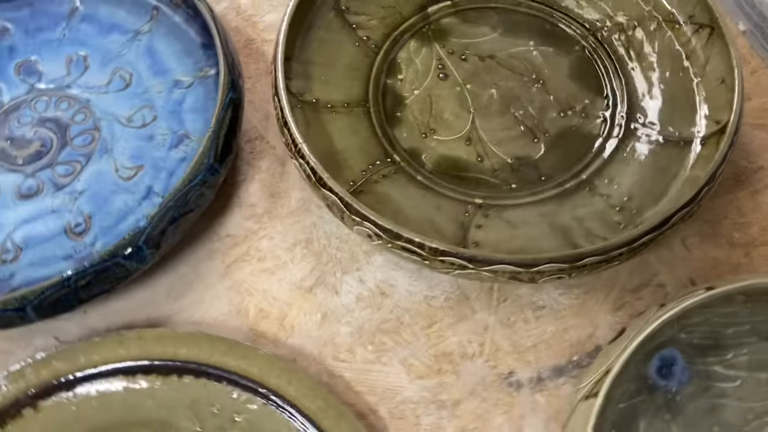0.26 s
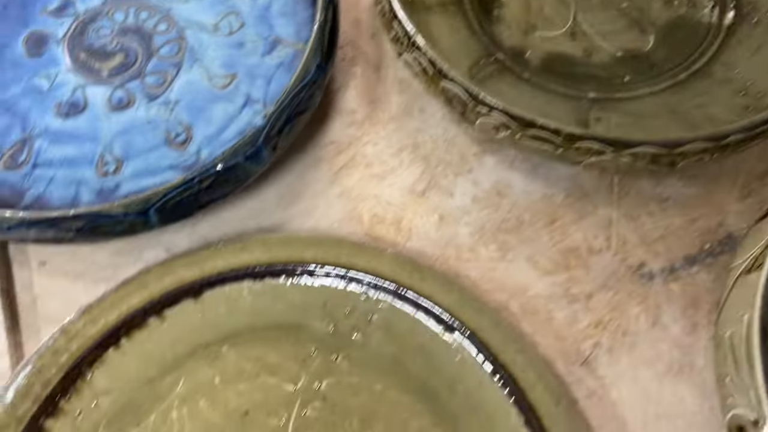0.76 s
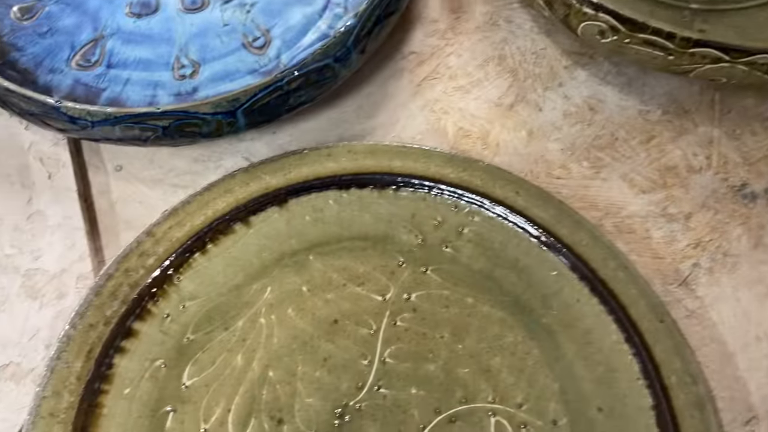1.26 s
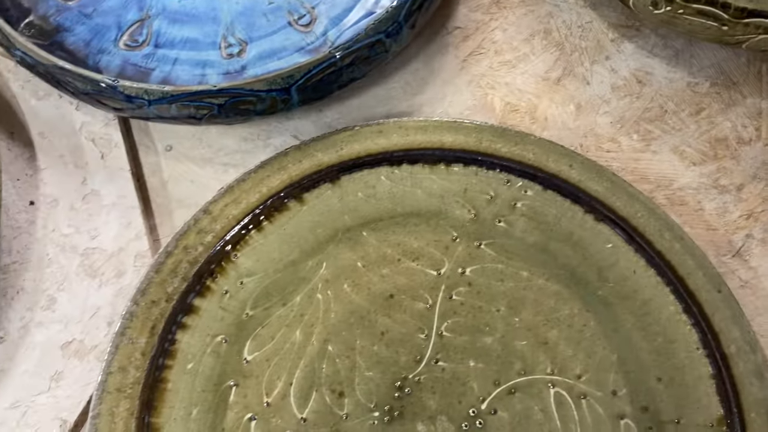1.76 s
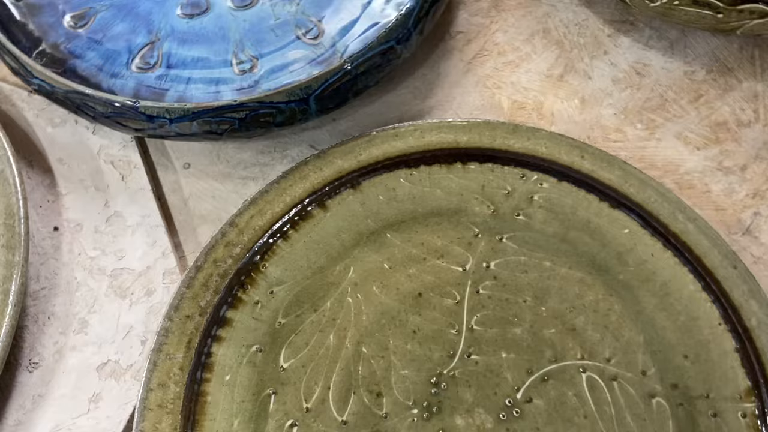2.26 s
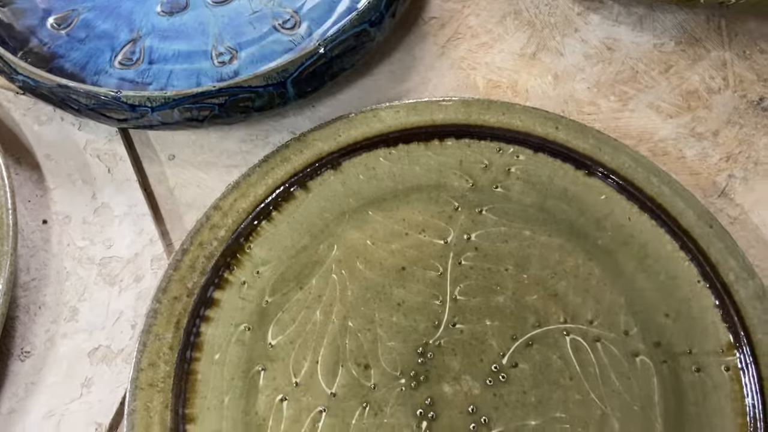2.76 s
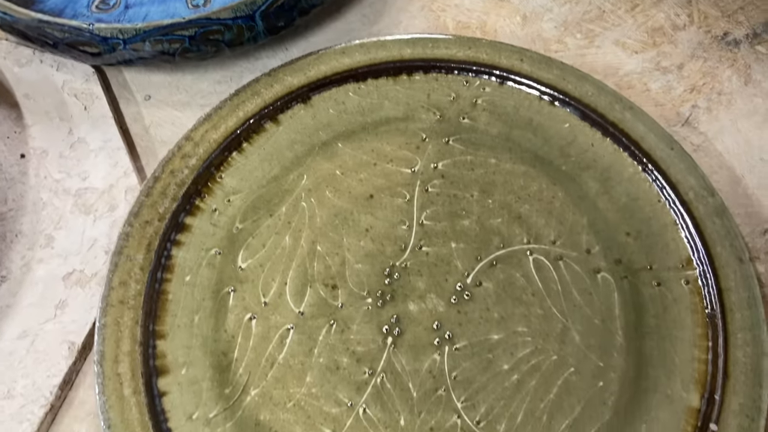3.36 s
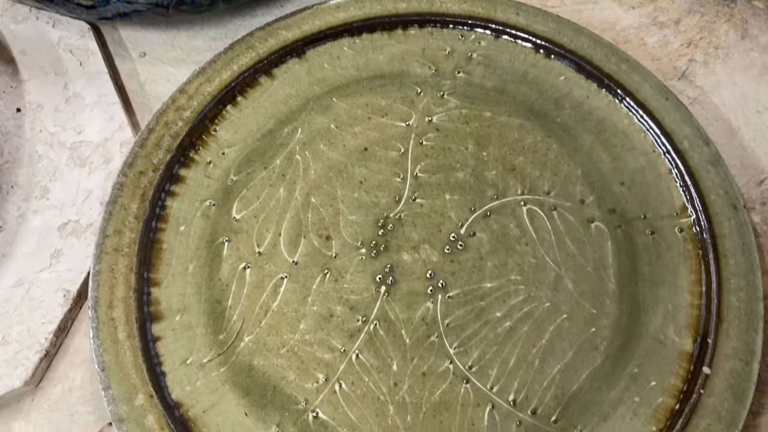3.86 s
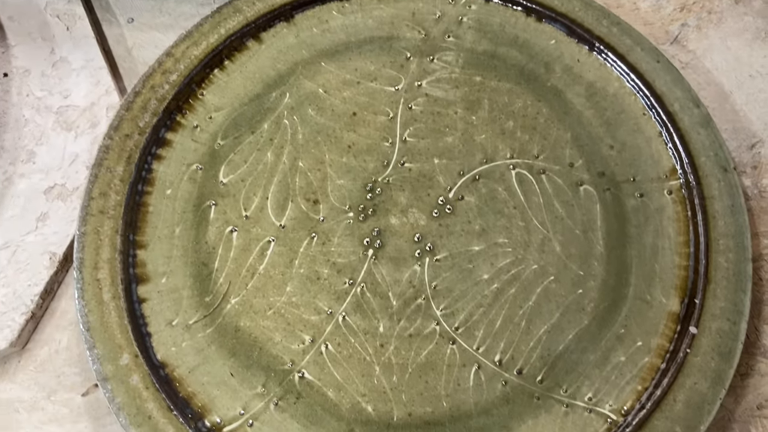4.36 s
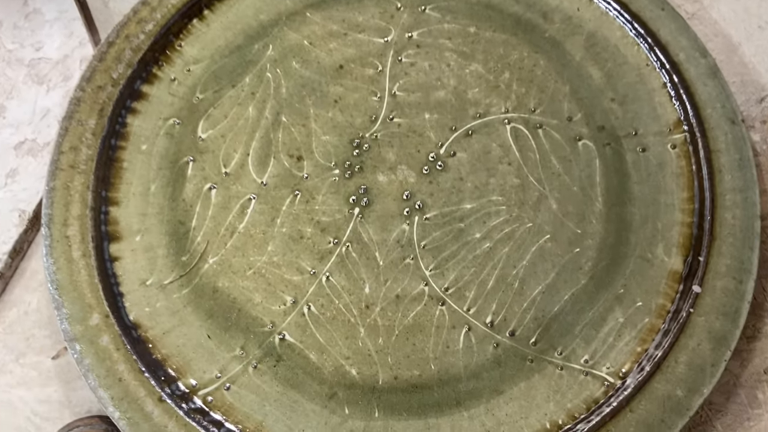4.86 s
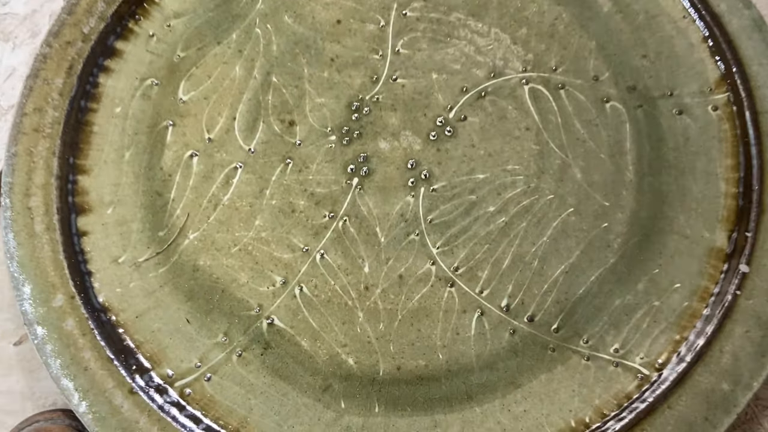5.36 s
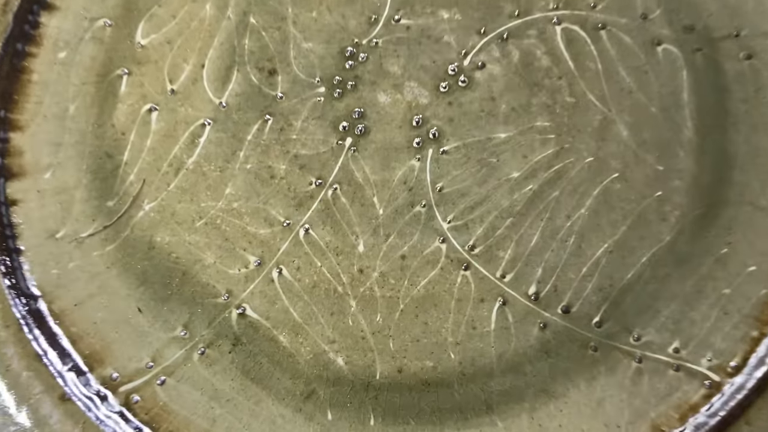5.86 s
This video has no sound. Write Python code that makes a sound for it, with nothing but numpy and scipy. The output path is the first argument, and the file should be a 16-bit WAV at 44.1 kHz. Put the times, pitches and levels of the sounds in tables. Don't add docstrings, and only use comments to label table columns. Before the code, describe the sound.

Right at the start heavy stoneware lands on a board table with a deep, woody thump, a faint glaze clink and softer rocking knocks. A short gritty drag ends in a bump, then a second heavy thud lands. Afterwards only low room rumble remains, with cloth rustle and small plastic ticks close to a handheld stereo microphone in a small furnished room.

```python
import sys
import numpy as np
from scipy import signal
from scipy.fft import rfft, irfft, next_fast_len
from scipy.io import wavfile
from scipy.ndimage import uniform_filter1d, map_coordinates

SR = 44100
rng = np.random.default_rng(int(sys.argv[2]) if len(sys.argv) > 2 else 0)


def generate_wav(sig):
    pcm = np.round(np.clip(np.atleast_2d(sig).T, -1, 1) * 32767).astype(np.int16)
    wavfile.write(sys.argv[1], SR, pcm)


def attenuation_scalar(level_db):
    decades = np.asarray(level_db, float) / 20
    return 10 ** decades


N = 269225


def unit(x):
    return x / np.sqrt(np.mean(x ** 2) + 1e-20)


def along(points, hz):
    f, v = np.transpose(points)
    return np.interp(np.log(hz + 1), np.log(f + 1), v)


def curves(rows, outside=None):
    s, *cols = np.transpose(rows)
    t = np.arange(N) / SR
    return [np.interp(t, s, c, outside, outside) for c in cols]


def wobble(rate):
    knots = rng.standard_normal(int(N * rate / SR) + 4)
    return map_coordinates(knots, [np.arange(N) * rate / SR])


def swells(rows, rest_db):
    t = np.arange(N) / SR
    power = attenuation_scalar(rest_db) ** 2
    for s, db, rise, t60 in rows:
        fall_db = np.where(t < s, 9 * ((s - t) / rise) ** 2, 60 * (t - s) / t60)
        power = power + attenuation_scalar(db - fall_db) ** 2
    return np.sqrt(power)


def filtered(x, response):
    n = x.shape[-1]
    m = next_fast_len(n + 8192)
    return irfft(rfft(x, m) * response(np.fft.rfftfreq(m, 1 / SR)), m)[..., :n]


def band(noise, low_hz, high_hz):
    def response(f):
        low = (f / low_hz) ** 2
        return low / (1 + low) / (1 + (f / high_hz) ** 2)
    return unit(filtered(noise, response))


# (frequency [Hz], side minus mid [dB])
PORT_WIDTH = [(60, -18), (150, -12.5), (380, -3.5), (950, 0.5), (2400, -0.5), (5500, -1), (7000, -17.5),
              (16000, -21)]


def rush(spectrum, patchy_db):
    z = signal.stft(rng.standard_normal((2, N + 512)), nperseg=512)[2]
    field = uniform_filter1d(rng.standard_normal(z.shape[1:]), size=6, axis=0)
    field = uniform_filter1d(field, size=8, axis=1)
    pair = signal.istft(z * attenuation_scalar(patchy_db * unit(field)), nperseg=512)[1][:, :N]
    mid, side = filtered(pair, lambda hz: attenuation_scalar(along(spectrum, hz)) * [1 + 0 * hz, attenuation_scalar(along(PORT_WIDTH, hz))])
    return np.array([mid + side, mid - side]) / np.sqrt(np.mean(mid ** 2))


def ring(modes, t, rise_cycles):
    total = 0
    for hz, db, t60 in modes:
        build_up = 1 - np.exp(-(t * hz / rise_cycles) ** 2)
        total = total + attenuation_scalar(db - 60 * t / t60) * build_up * np.sin(2 * np.pi * hz * t)
    return total


def add(track, s, sound):
    i = round(s * SR)
    track[..., i:i + sound.shape[-1]] += sound[..., :track.shape[-1] - i]


def sides(db):
    return attenuation_scalar([[db / 2], [-db / 2]])


# (frequency [Hz], t60 [s])
ROOM_DECAY = [(70, 0.83), (200, 0.53), (500, 0.28), (1200, 0.18), (4000, 0.17), (12000, 0.1)]
EARLY_DB, EARLY_S = -9, .006


def in_room(sound, wet_db):
    hz, t, z = signal.stft(rng.standard_normal((2, SR // 2)), SR, nperseg=256)
    decay = attenuation_scalar(-60 * t / along(ROOM_DECAY, hz)[:, None])
    tail = signal.istft(z * decay, SR, nperseg=256)[1]
    tail = tail / np.linalg.norm(tail[0])
    mid, side = filtered(tail, lambda f: .45 + .55 * f ** 2 / (f ** 2 + 220 ** 2))
    side = filtered(side, lambda f: attenuation_scalar(along(PORT_WIDTH, f) - 1.0))
    early = side * np.exp(-np.arange(len(side)) / (EARLY_S * SR))
    early = attenuation_scalar(EARLY_DB) * early * np.linalg.norm(side) / np.linalg.norm(early)
    ears = attenuation_scalar(wet_db) * np.array([mid + side, mid - side]) + early * [[1], [-1]]
    wet = signal.fftconvolve(sound[None], ears, axes=1)
    return wet + np.pad(sound, (0, wet.shape[1] - len(sound)))


# (frequency [Hz], level [dB])
RUMBLE_SPECTRUM = [(15, -9.5), (34, 0), (59, 1.5), (110, -8), (140, -21.5), (190, -21.5), (260, -30.5),
                   (500, -81)]
# (frequency [Hz], level [dB])
MURMUR_SPECTRUM = [(88, -41), (150, 1.5), (173, -8), (231, -11.5), (297, -13), (389, -17.5), (668, -20.5),
                   (1500, -38), (1950, -67), (3300, -120)]
# (peak time [s], peak level [dB], rise [s], t60 [s])
FLOOR_SHUDDERS = [(.32, -55, 0.11, 0.87), (.44, -39.5, 0.09, 0.64), (.58, -46, .05, 0.33),
                  (1.97, -42, 0.199, 0.83), (2.62, -59, 0.099, 3.8)]
# (peak time [s], peak level [dB], rise [s], t60 [s])
ROOM_FILLS = [
    (.13, -40.5, 0.031, 0.68),
    (.45, -63, .03, 1.7),
    (1.1, -67, 0.88, 0.99),
    (2.0, -62.5, 0.03, 1.4),
    (2.6, -68.5, 0.43, 1.94),
    (5.5, -74, 0.32, 2),
]
# (frequency [Hz], level [dB], start [s], stop [s])
FAR_MACHINE = [
    (157, -67, 3.8, 4.68),
    (4870, -101, 4.2, 4.66),
]
RUMBLE_DB, MURMUR_DB = -61.5, -73
ROOM_PAN_DB = 2


def air():
    out = attenuation_scalar(5.5) * swells(FLOOR_SHUDDERS, RUMBLE_DB) * rush(RUMBLE_SPECTRUM, patchy_db=-0.48)
    out = out + attenuation_scalar(2.0) * swells(ROOM_FILLS, MURMUR_DB) * rush(MURMUR_SPECTRUM, patchy_db=2.5)
    t = np.arange(N) / SR
    for hz, db, start, stop in FAR_MACHINE:
        running = np.clip(np.minimum(t - start, stop - t) / .1, 0, 1)
        level = running * attenuation_scalar(db + hz ** .17 * wobble(14))
        drift = .6 * wobble(15) + hz / 3000 * wobble(90)
        out = out + level * np.sin(2 * np.pi * hz * t + drift)
    return sides(ROOM_PAN_DB) * out


# (time [s], rustle level [dB])
ARM_MOVEMENT = [(0, -89.5), (.092, -86.5), (.105, -70.5), (.63, -68), (.85, -74.5), (.98, -67),
                (1.1, -69.5), (1.21, -82.5), (1.51, -89.5), (1.65, -71), (3.02, -75.5), (3.06, -82),
                (3.72, -89.5), (4.81, -87.5), (5.32, -80.5), (5.45, -73.5), (5.69, -80), (6.1, -86)]
# (frequency [Hz], level [dB])
FABRIC_SPECTRUM = [(1500, -32.5), (2800, -8), (4500, -10), (7500, -10.5), (11300, -9.5), (12600, -11),
                   (13400, -22), (15500, -23.5), (15850, -55)]
# (frequency [Hz], level [dB])
RUB_SPECTRUM = [(500, -30.5), (900, -0.5), (1500, -1), (2300, -2), (3200, -13), (5000, -23.5), (8000, -81)]
# (peak time [s], peak level [dB], rise [s], t60 [s])
HAND_SCUFFS = [
    (.14, -67.5, 0.061, 1.7),
    (1.56, -78.5, 0.041, 1.06),
    (1.87, -67.5, 0.1, 1.2),
    (2.46, -65.5, 0.022, 0.9),
    (2.74, -74.5, 0.13, 0.67),
]
# (time [s], level [dB])
SLEEVE_BRUSH = [(5.27, -104), (5.36, -75.5), (5.45, -75.5), (5.5, -90), (5.6, -80.5), (5.72, -77.5),
                (5.76, -102)]
RUB_DB, RUB_GROWS, ARMS_PAN_DB = -83.5, 0.64, 0


def cloth():
    arms_db, = curves(ARM_MOVEMENT)
    fine_gain = attenuation_scalar(arms_db + 0.86 * wobble(22) + 0.9 * wobble(5.5))
    fine = fine_gain * rush(FABRIC_SPECTRUM, patchy_db=2.0)
    rub_gain = swells(HAND_SCUFFS, RUB_DB + RUB_GROWS * (arms_db + 80)) * attenuation_scalar(0.64 * wobble(30))
    rub = rub_gain * rush(RUB_SPECTRUM, patchy_db=1.93)
    brush_gain = attenuation_scalar(curves(SLEEVE_BRUSH, -140)[0] + 2.2 * wobble(40))
    brush_spectrum = [(1500, -22), (3000, -10.0), (4000, -0.5), (5200, -9.5), (8000, -9.0), (12300, -8.5),
                      (13500, -32), (16000, -60)]
    brush = brush_gain * rush(brush_spectrum, patchy_db=2.0)
    return sides(ARMS_PAN_DB) * (fine + rub + brush)


# (frequency [Hz], level [dB])
SHEEN_SPECTRUM = [(13000, -40), (13900, -6), (14600, 0), (15500, -2), (15850, -40)]
SHEEN_DB, SHEEN_GROWS = -87.5, 1.5


def sheen():
    level_db = SHEEN_DB + SHEEN_GROWS * (curves(ARM_MOVEMENT)[0] + 70)
    return attenuation_scalar(level_db + 1.2 * wobble(9)) * rush(SHEEN_SPECTRUM, patchy_db=1.5)


def ticks(rows):
    out, t = np.zeros((2, N)), np.arange(SR // 40) / SR
    for s, db, hz, snap_db, pan_db in rows:
        noise = rng.standard_normal((2, len(t)))
        t60 = .0032 + .00014 * max(-snap_db, 0)
        body = ring([(hz, 0, t60), (6900, .35 * snap_db - 10.0, .004)], t, rise_cycles=1.2)
        body = body + attenuation_scalar(-9.0 - 60 * t / 0.0044) * band(noise[0], low_hz=997, high_hz=4476)
        snap = band(band(noise[1], 8000, 12000), 10000, 14000)
        snap = attenuation_scalar(snap_db + 3 - 60 * t / 0.0031) * snap
        add(out, s + 0.00017, sides(pan_db) * attenuation_scalar(db + 6.0) * in_room(body + snap, wet_db=-9.5))
    return out


# (time [s], peak level [dB])
STRAP_SLIPS = [(0.0074, -69), (0.0314, -60.5), (0.058, -66.5), (0.7394, -61), (0.7622, -58), (0.7961, -55),
               (0.8206, -56.5), (0.845, -52.5), (0.8755, -55), (0.908, -58), (0.946, -51.5),
               (0.9834, -53.5), (1.2343, -65), (1.4613, -66.5), (1.6254, -59.5), (2.1695, -59.5),
               (2.67, -57), (3.476, -60), (4.144, -66.5), (4.324, -74)]
CREAK_HZ, CREAK_SPREAD = 2100, .05
CREAK_SNAP_DB, SNAP_GROWS = -21, .6
CREAK_PAN_DB = 5


def creaks():
    rows = []
    for s, db in STRAP_SLIPS:
        hz = CREAK_HZ * (1 + CREAK_SPREAD * rng.standard_normal())
        snap_db = CREAK_SNAP_DB + SNAP_GROWS * (db + 59.0)
        rows.append((s, db, hz, snap_db, CREAK_PAN_DB))
    return ticks(rows)


# (time [s], peak level [dB], frequency [Hz], t60 [s], build-up [cycles])
CONTACT_NOTES = [(.098, -16, 719, 0.058, 0.76), (0.098, -42, 1080, .05, 1), (.102, -61.5, 7350, .1, 8),
                 (.102, -60, 6170, 0.04, 12), (.101, -66.5, 3830, .12, 4), (.101, -71, 4740, .15, 4),
                 (0.1, -72, 5130, 0.16, 4), (.225, -44.5, 732.5, 0.24, 6), (.225, -55, 1455, 0.25, 9),
                 (1.712, -43, 521, 0.12, 1.2), (1.712, -51, 1023, 0.074, 1.2),
                 (1.713, -51.5, 2110, 0.067, 2.5), (1.755, -42.5, 248, .1, 0.9), (1.777, -51, 1227, .12, 4),
                 (1.831, -49, 1818, 0.13, 9.1), (1.861, -17.5, 238, 0.063, .8),
                 (1.968, -30, 290, 0.053, 0.52), (2.049, -52.5, 954, 0.047, 3.9),
                 (2.454, -38, 646, 0.13, 1.3), (2.454, -42, 810, 0.043, 0.54), (2.454, -40, 563, 0.13, 1),
                 (2.454, -44.5, 715, 0.09, 1.2), (2.455, -43.5, 414, 0.15, 1.4),
                 (2.4575, -13, 76, 0.2, 1.1), (2.463, -19.5, 150, 0.14, 0.9), (.099, -16, 313, 0.11, 0.61),
                 (.1, -15.5, 200, 0.11, 1.15), (0.315, -20.5, 132, 0.073, .6),
                 (0.3615, -46, 649, 0.031, .6), (.429, -44, 640, 0.037, .6), (0.432, -44, 423, 0.068, .6),
                 (0.446, -57, 863, 0.11, 4.5), (1.831, -35, 208, 0.1, 0.47), (1.86, -46, 1440, 0.043, 2.8),
                 (1.967, -52, 1030, 0.031, 0.88), (.19, -52, 1980, 0.071, 2.5),
                 (2.433, -59, 774, 0.024, .8), (2.47, -42.5, 493, 0.13, 3.7), (2.499, -48, 350, 0.25, 4.3)]
# (time [s], peak level [dB], frequency [Hz], t60 [s], build-up
MORE_NOTES = [(.098, -11, 76, .13, .8), (2.4607, -11, 105, .1, 0.83), (0.51, -26, 127.3, 0.11, 0.74),
              (2.488, -28, 160, .12, 1.2), (2.52, -38, 291, 0.18, 2.8), (1.885, -29, 201, .1, 1.4),
              (1.905, -39, 266, 0.073, 1.5), (0.22, -55.5, 1082, .2, 4), (.2, -62.5, 2428, 0.28, 9)]
# (time [s], peak level [dB], frequency [Hz], t60 [s], build-up [cycles])
EDGE_NOTES = [
    (.0957, -24, 560, .02, .6),
    (.086, -50, 500, .05, 1),
    (.653, -55, 1712, .07, 6),
    (.656, -58, 1200, .06, 4),
    (4.7832, -62, 2000, .012, 1),
]


def notes():
    out, t = np.zeros((2, N)), np.arange(SR // 4) / SR
    for s, db, hz, t60, rise in CONTACT_NOTES + MORE_NOTES + EDGE_NOTES:
        note = ring([(hz, 0, t60)], t, rise)
        add(out, s, attenuation_scalar(db) * in_room(note, wet_db=-10.0))
    return out


# (time [s], peak level [dB], t60 [s], low edge [Hz], high edge [Hz])
GLAZE_GRINDS = [
    (.0952, -54, .12, 1900, 3000),
    (.1866, -58, .13, 2700, 3600),
    (2.4528, -50, .045, 2600, 4300),
]


def splinters():
    out, t = np.zeros((2, N)), np.arange(SR // 8) / SR
    for s, db, t60, low_hz, high_hz in GLAZE_GRINDS:
        grit = band(rng.standard_normal(len(t)), low_hz, high_hz)
        grit = band(band(grit, low_hz, high_hz), 600, high_hz)
        add(out, s, attenuation_scalar(db) * in_room(attenuation_scalar(-60 * t / t60) * grit, wet_db=-6.5))
    return out


# (time [s], peak level [dB], crack level [dB], build-up [cycles], slap level [dB])
HARD_LANDINGS = [
    (0.097, -6, -40.5, 0.86, -4.5),
    (2.4527, -9, -31.5, 1.32, -22.5),
]
# (frequency [Hz], level [dB], t60 [s])
FIRST_BOARDS = [(75.4, 2.5, 0.21), (127.4, -1, 0.16), (166.6, 5.5, 0.12), (267.3, -2.5, 0.28),
                (351, -5.5, 0.08), (435, -4, 0.13), (484, -2, 0.076), (636, -6.5, 0.041), (824, -1, 0.01),
                (864, -6, 0.056), (959, -6, 0.055), (1173.3, -20.5, .05), (1271, -17, 0.023),
                (1583, -27.5, 0.049)]
# (frequency [Hz], level [dB], t60 [s])
SECOND_BOARDS = [(100.7, -27, 0.13), (220, -7, 0.13), (290, 0, 0.07), (302, -23.5, 0.43), (350, -25, 0.27),
                 (500, -32, 0.093), (580, -29, 0.1), (640, -46, 0.032), (765, -26, 0.049),
                 (980, -20, 0.019), (1290, -49, 0.041)]
# (level [dB], t60 [s])
CRACK_ONSETS = [(0, 0.014), (5, 0.012)]
TABLE_PAN_DB = 0.5


def blows():
    out, t = np.zeros((2, N)), np.arange(SR // 2) / SR
    boards = (FIRST_BOARDS, SECOND_BOARDS)
    for landing, board, (head_db, head_t60) in zip(HARD_LANDINGS, boards, CRACK_ONSETS):
        s, db, crack_db, rise, slap_db = landing
        noise = rng.standard_normal((2, len(t)))
        crack = band(band(noise[0], 1400, 2300), 690, 1900)
        crack_decay = attenuation_scalar(head_db - 60 * t / head_t60) + attenuation_scalar(-5.5 - 60 * t / 0.088)
        crack = attenuation_scalar(crack_db - 0.5) * crack_decay * (1 - np.exp(-t / 0.00072)) * crack
        pulse_t = t - .0033
        slap = -np.exp(-(pulse_t / .0016) ** 2) * np.cos(2 * np.pi * 480 * pulse_t)
        rattle = band(band(band(noise[1], 330, 900), 250, 670), 100, 1010)
        slap = slap + attenuation_scalar(-5.5 - 60 * t / 0.073) * (1 - np.exp(-(t / 0.0012) ** 2)) * rattle
        weight = ring(board, np.maximum(t - .001, 0), rise)
        blow = attenuation_scalar(-6.5) * weight + attenuation_scalar(slap_db) * slap + crack
        add(out, s, sides(TABLE_PAN_DB) * attenuation_scalar(db) * in_room(blow, wet_db=-8.5))
    return out


# (peak time [s], peak level [dB], rise [s], t60 [s])
FRAME_SLAPS = [(.112, -25.5, .012, 0.16)]
# (frequency [Hz], level [dB])
FRAME_SPECTRUM = [(90, -30), (190, -4), (280, 2.5), (400, -8), (750, -12.5), (1200, -40), (3000, -100)]
# (peak time [s], peak level [dB], rise [s], t60 [s])
SOFT_BUMPS = [
    (.48, -51, 0.022, 0.3),
    (1.79, -52, 0.015, 0.36),
    (1.87, -32.5, 0.0073, 0.075),
    (1.977, -39, 0.0042, 0.087),
    (2.5, -42.5, 0.033, 0.54),
]
# (frequency [Hz], level [dB])
PADDED_SPECTRUM = [(90, -24), (190, -4.5), (280, 0.5), (400, -10), (600, -19.5), (1000, -60), (3000, -100)]


def frame():
    slaps = swells(FRAME_SLAPS, -120) * rush(FRAME_SPECTRUM, patchy_db=3.5)
    bumps = swells(SOFT_BUMPS, -120) * rush(PADDED_SPECTRUM, patchy_db=4.0)
    return slaps + bumps


# (time [s], peak level [dB], board note [Hz], knock level [dB], t60 [s])
SOFT_LANDINGS = [(0.133, -7, 115.3, -20.5, 0.11), (0.219, -23.5, 133, -16.5, 0.13),
                 (0.31, -38.5, 125, -9.5, 0.11), (0.349, -22, 96.4, -23.5, 0.07),
                 (0.436, -22, 105.2, -24, 0.29), (0.48, -23.5, 75.4, -24, 0.19),
                 (0.51, -14, 65.5, -32.5, 0.11), (0.585, -39, 70, -31, 0.16),
                 (0.668, -42.5, 72.7, -11, 0.11), (1.038, -40, 139.4, -7, 0.17),
                 (1.101, -39.5, 92, -34, 0.11), (1.185, -46, 58.8, -15.5, 0.22),
                 (1.231, -40.5, 68.2, -25.5, 0.11), (1.802, -51, 187, -6, 0.13),
                 (1.867, -16.5, 117.3, -20, 0.084), (1.918, -28, 67.3, -39, 0.12),
                 (1.976, -25.5, 128.5, -18, 0.1), (2.061, -29, 129, -19.5, 0.14),
                 (2.55, -31, 85.5, -20.5, 0.26), (2.617, -43, 89, -24, 0.16), (2.741, -23, 82.6, -36, 0.11)]
# (frequency [Hz], level [dB])
KNOCK_SPECTRUM = [(120, -18), (200, 18.5), (320, 6), (500, -5.5), (900, -19), (1500, -34), (3000, -56.5),
                  (9000, -100)]


def thuds():
    out, t = np.zeros((2, N)), np.arange(SR // 3) / SR
    for s, db, hz, knock_db, t60 in SOFT_LANDINGS:
        note = ring([(hz, 0, t60), (hz * 1.613, -6, t60 * 0.38)], t, rise_cycles=0.5)
        knock = unit(filtered(rng.standard_normal(len(t)), lambda f: attenuation_scalar(along(KNOCK_SPECTRUM, f))))
        knock = attenuation_scalar(knock_db + 8.5 - 60 * t / 0.099) * (1 - np.exp(-t / 0.0063)) * knock
        add(out, s - .002, attenuation_scalar(db + 1.5) * in_room(note + knock, wet_db=-10))
    return out


# (time [s], peak level [dB], edge level [dB], wood level [dB], t60 [s])
RIM_TAPS = [(0.1875, -40, -30, 5, 0.01), (0.3615, -68, -19, 14.5, 0.023), (0.4294, -56.5, -5, 4, 0.023),
            (1.0364, -63.5, 4, 13.5, 0.021), (1.5275, -57, 0, 4.5, 0.031), (1.5536, -50.5, -16, -5, 0.019),
            (1.711, -33, -21, -6, 0.022), (1.9663, -48, -22, 4.5, 0.024)]


def taps():
    out, t = np.zeros((2, N)), np.arange(SR // 8) / SR
    for s, db, edge_db, wood_db, t60 in RIM_TAPS:
        noise = rng.standard_normal((3, len(t)))
        edge = band(noise[0], low_hz=6000, high_hz=13000) * (1 - np.exp(-t / 0.0018))
        edge = attenuation_scalar(edge_db - 60 * t / (0.33 * t60)) * edge
        rim = band(noise[1], low_hz=1680, high_hz=3202) * (1 - np.exp(-(t / 0.0042) ** 2))
        rim = attenuation_scalar(-60 * t / t60) * rim
        wood = band(band(noise[2], 370, 650), 420, 900)
        wood = wood + ring([(538, 0.69, 0.15), (625, -2, 0.24)], t, rise_cycles=0.83)
        wood = attenuation_scalar(wood_db - 5.0 - 60 * t / (2.4 * t60)) * wood * (1 - np.exp(-(t / 0.0019) ** 2))
        add(out, s - .0015, attenuation_scalar(db) * in_room(edge + rim + wood, wet_db=-3.5))
    return out


# (time [s], peak level [dB])
GLAZE_CLINK = (0.187, -40)
# (frequency [Hz], level [dB], t60 [s])
GLAZE_MODES = [(576, 7.5, 0.096), (720, -7, 0.23), (870, -2, 0.13), (1245, -7, 0.066), (1244, -8.5, 0.17),
               (1470, -14, 0.18), (1720, 5, 0.04), (1840, -13, 0.042), (2380, -25, 0.36),
               (3040, -19.5, 0.21), (3591, -22, 0.2), (3810, -30, 0.13)]
# (time [s], peak level [dB], modes (frequency [Hz], level [dB], t60 [s]))
HUMMING_BOWL = (0.672, -46.5, [(228.2, 2.5, 0.4), (446, -1.5, 0.26), (554, -10.5, 0.35), (1490, -24, 0.27)])


def clinks():
    out, t = np.zeros((2, N)), np.arange(SR // 3) / SR
    s, db = GLAZE_CLINK
    add(out, s, attenuation_scalar(db) * in_room(ring(GLAZE_MODES, t, rise_cycles=0.5), wet_db=-13.0))
    s, db, modes = HUMMING_BOWL
    add(out, s, attenuation_scalar(db) * in_room(ring(modes, t, rise_cycles=3.9), wet_db=-12.5))
    return out


CHATTER_DB, CHATTER_T60_S = -16, .12


def chatter():
    out, t = np.zeros((2, N)), np.arange(SR // 3) / SR
    s, db = GLAZE_CLINK
    grit = band(band(rng.standard_normal(len(t)), 900, 2000), 800, 3100)
    grit = attenuation_scalar(-60 * t / CHATTER_T60_S) * grit
    add(out, s, attenuation_scalar(db + CHATTER_DB) * in_room(grit, wet_db=-1.0))
    return out


# (time [s], peak level [dB], body [Hz], snap level [dB])
FAINT_TICKS = [(0.45, -60, 5470, -6), (0.4953, -63, 4500, -12), (0.5125, -63, 4000, -3),
               (.6463, -59, 4440, -18), (1.18, -61, 1500, -19), (1.3202, -80, 2435, -13.5),
               (1.409, -72.5, 2300, -18), (1.476, -66, 2310, -19), (2.688, -58, 2300, -16.5),
               (3.355, -80, 6490, 4.5), (2.4529, -37, 3100, -24), (3.134, -67.5, 1500, -30),
               (3.312, -70, 1600, -31), (1.102, -64.5, 7400, 7), (4.883, -74, 3500, -15)]


def faint_ticks():
    return ticks([(*row, CREAK_PAN_DB) for row in FAINT_TICKS])


# (time [s], level [dB])
SLOW_CREEP = [(.545, -80), (.58, -67), (.635, -68), (.657, -54), (.673, -56), (.685, -74), (.74, -93)]
# (time [s], level [dB])
FAST_DRAG = [(1.735, -60), (1.757, -59.5), (1.78, -45), (1.81, -41), (1.845, -44), (1.868, -48.5),
             (1.885, -58), (1.93, -80)]
# (frequency [Hz], width [Hz], level [dB])
DISH_MODES = [(546, 58, -0.5), (857, 31.6, 1), (1178.5, 55, -5), (1460, 48, -13), (1706, 26, 0),
              (2457, 55, -14.5)]
# (frequency [Hz], level [dB])
GRIT_SPECTRUM = [(100, -8), (150, 6.5), (500, -10), (1000, -13.5), (2200, -19.5), (4500, -26.5),
                 (7600, -34.5), (11000, -35.5), (16000, -45)]


def slides():
    size_db = 2.5 * np.minimum(rng.exponential(size=(2, N)), 5) + 1.5 * wobble(70)
    grains = rng.standard_normal((2, N)) * attenuation_scalar(size_db)

    def dish(f):
        total = 0
        for k, (centre, width, db) in enumerate(DISH_MODES):
            damping = 1j * f * width
            total = total + (-1) ** k * attenuation_scalar(db) * damping / (centre * centre - f * f + damping)
        return total

    creep = attenuation_scalar(curves(SLOW_CREEP, -140)[0]) * unit(filtered(grains[0], dish))
    hiss = unit(filtered(grains[1], lambda hz: attenuation_scalar(along(GRIT_SPECTRUM, hz))))
    drag = attenuation_scalar(curves(FAST_DRAG, -140)[0]) * hiss
    return in_room(creep + drag, wet_db=-4.5)[:, :N]


# (peak time [s], peak level [dB], rise [s], t60 [s])
STRAP_STRAINS = [
    (.95, -73.5, 0.15, 1.2),
    (1.07, -89, 0.056, 0.63),
    (1.62, -82.5, .05, 0.55),
]
# (frequency [Hz], level [dB])
STRAP_SPECTRUM = [(1700, -30.5), (2250, 1), (2800, -14), (3900, -6.5), (4700, -4), (5400, -29)]


def strap():
    return swells(STRAP_STRAINS, -120) * rush(STRAP_SPECTRUM, patchy_db=1.0)


# (time [s], peak level [dB], body [Hz], snap level [dB])
CASE_SNAPS = [(3.133, -65, 3160, -20), (3.2155, -74, 1700, -28), (3.2285, -77, 3000, -14),
              (3.311, -71.5, 3400, -6.5), (3.3743, -52.5, 2990, -6.5), (3.3935, -60, 3790, -4.5),
              (3.4531, -60, 3040, -3), (3.8902, -60, 2484, 4), (4.0686, -60, 3210, -2),
              (4.4612, -58.5, 3014, 4.5), (4.4937, -49, 3000, -5), (4.783, -57.5, 2000, -14.5),
              (4.916, -63, 2007, -15), (4.9554, -70, 3280, 3.5), (4.9878, -65, 2080, -24),
              (5.0175, -62.5, 2600, -5), (5.2893, -68.5, 1887, 2), (5.5025, -62, 3610, 1),
              (5.5207, -49.5, 2890, -5), (5.9068, -60.5, 3100, -4)]
CASE_PAN_DB = 4.5


def case_ticks():
    return ticks([(*row, CASE_PAN_DB) for row in CASE_SNAPS])


def scene():
    pots = blows() + thuds() + clinks() + taps() + slides()
    table = notes() + splinters() + frame() + chatter()
    near = cloth() + sheen() + creaks() + strap() + case_ticks() + faint_ticks()
    return air() + pots + table + near


def band_limit(x):
    return signal.sosfilt(signal.butter(12, 16480, fs=SR, output="sos"), x)


# (frequency [Hz], lead [cycles])
PORT_LEAD = [(6900, 0), (9000, -.5), (11200, -1), (13400, -1.5), (15500, -2), (17500, -2.5)]


def record(dry):
    hz_ports, cycles = np.transpose(PORT_LEAD)

    def microphone(hz):
        lead = np.exp(1j * np.pi * np.outer([1, -1], np.interp(hz, hz_ports, cycles)))
        s = 1j * hz / 38
        bass_cut = (s ** 2 / (1 + 1.4 * s + s ** 2)) ** 2
        top_cut = 1 / np.sqrt(1 + (hz / 15600) ** 40)
        return lead * bass_cut * top_cut

    return band_limit(filtered(dry, microphone))


dry = scene()
out = record(dry)
generate_wav(out)
```